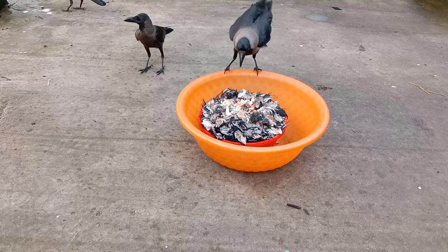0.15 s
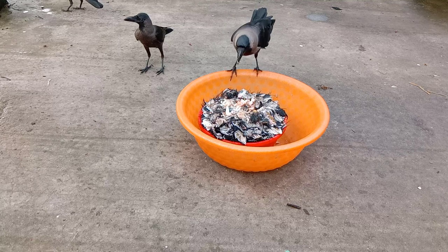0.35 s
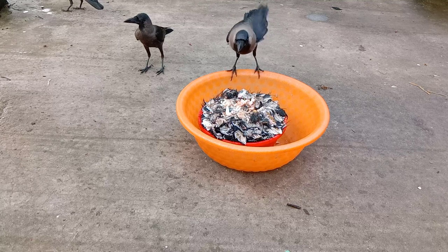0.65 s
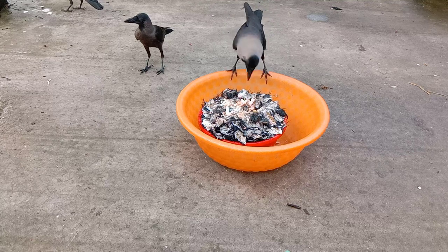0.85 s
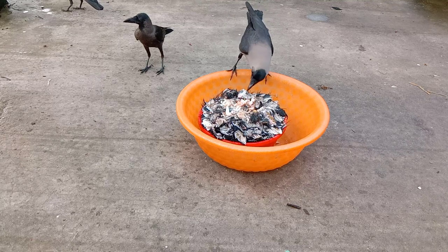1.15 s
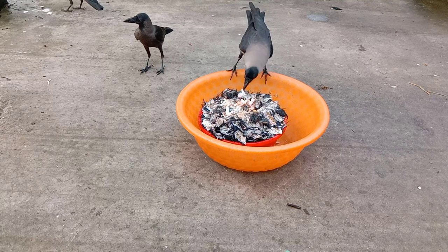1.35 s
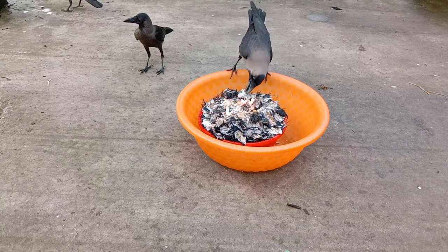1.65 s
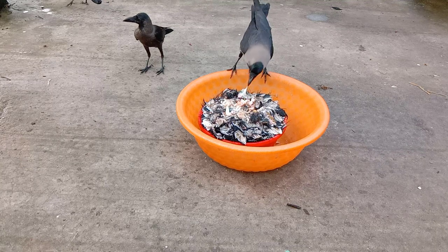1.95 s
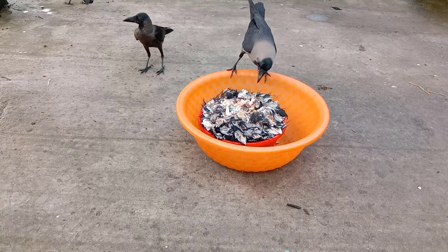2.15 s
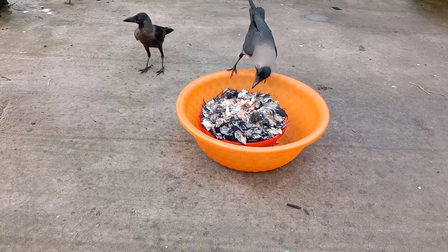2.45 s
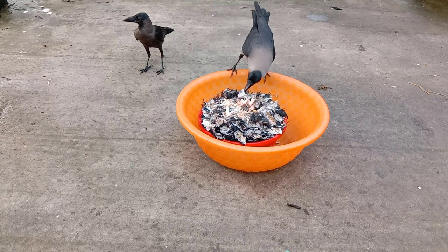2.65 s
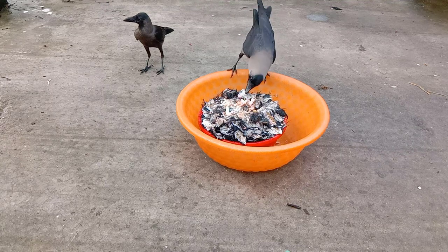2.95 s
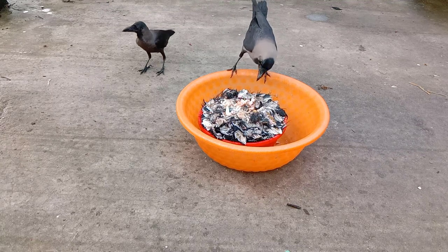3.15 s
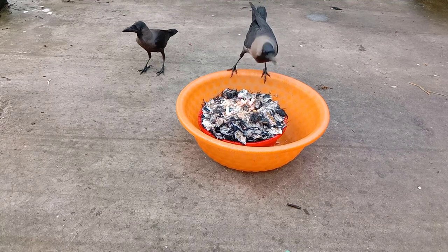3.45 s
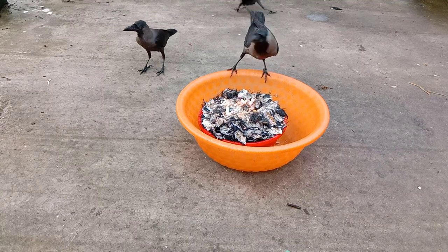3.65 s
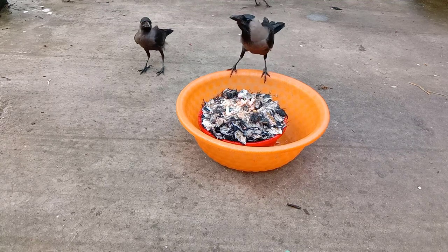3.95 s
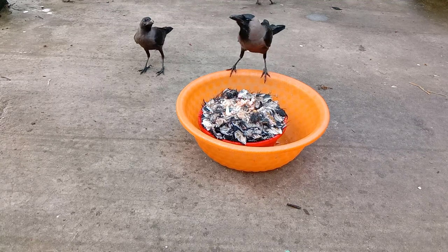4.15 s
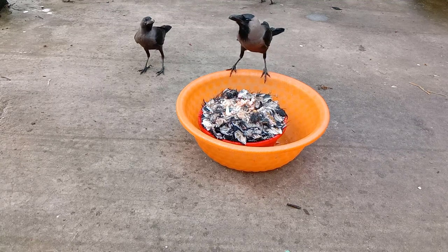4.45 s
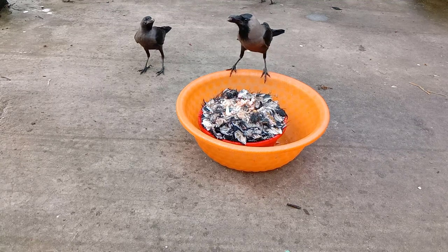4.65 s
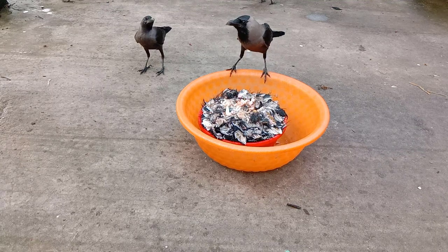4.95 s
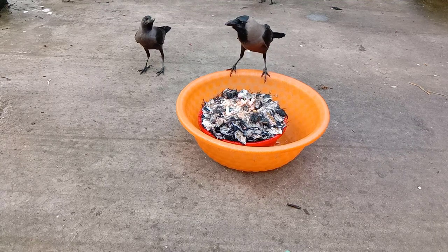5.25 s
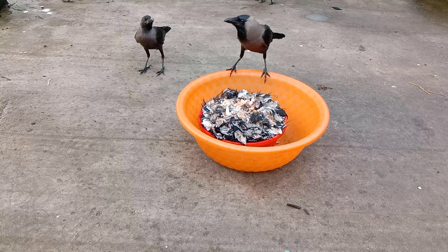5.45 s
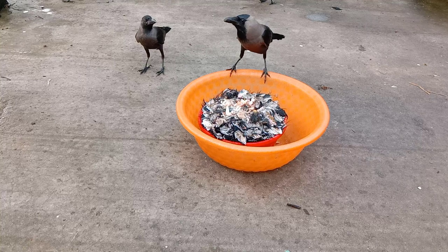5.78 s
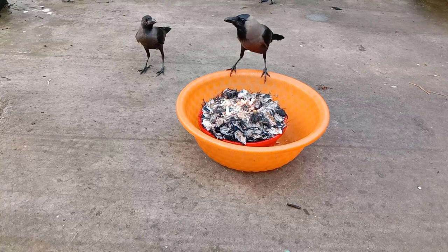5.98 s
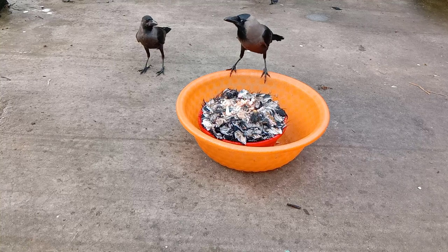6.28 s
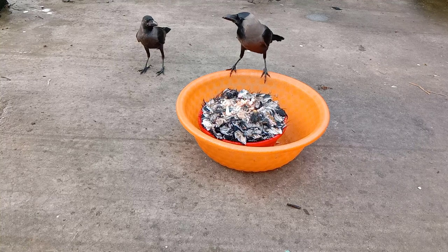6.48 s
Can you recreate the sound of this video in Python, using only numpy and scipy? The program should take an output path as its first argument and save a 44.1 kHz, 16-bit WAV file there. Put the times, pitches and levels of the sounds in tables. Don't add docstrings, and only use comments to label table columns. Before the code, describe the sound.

A crow near the microphone caws six times, each short, harsh and rattling, rising quickly then sagging. After the second caw starts, one sharp beak knock lands on a plastic basin; later light ticks and dry rustling follow the third. Behind are a throbbing insect, a buzzy small bird and far calls. Open concrete yard with short echoes and quiet, faintly hissing air.

```python
import sys
import numpy as np
from scipy import signal
from scipy.io import wavfile
from scipy.ndimage import uniform_filter1d

SR = 44100
rng = np.random.default_rng(int(sys.argv[2]) if len(sys.argv) > 2 else 0)


def makeup_ratio(level_db):
    decades = np.asarray(level_db, float) / 20
    return 10 ** decades


def store_pcm(level_fs):
    pcm = np.round(np.clip(level_fs, -1, 1) * 32767).astype(np.int16)
    wavfile.write(sys.argv[1], SR, np.atleast_2d(pcm).T)


N = 291942

# (frequency [Hz], density [dB per Hz])
AIR_SPECTRUM = [(25, -23.5), (50, -20.5), (100, -19.5), (200, -13), (500, -24), (2300, -23.5),
                (4200, -28.5), (5400, -9.5), (6200, -23), (7300, -25.5), (7700, -16), (9100, -6.5),
                (10500, -22.5), (11100, -61)]
# (frequency [Hz], width [Hz], level [dB])
HUM_TONES = [(99.9, 6.4, -84.5), (114, 4.6, -89), (203.1, 6.5, -83)]
# (peak time [s], width [s], level [dB])
WIND_GUSTS = [(.25, 0.07, -67), (1.88, .15, -82.5), (2.84, .07, -63), (3.051, 0.13, -64), (3.7, 0.48, -80),
              (4.458, 0.093, -88), (5.53, 0.062, -69), (5.79, 0.047, -68), (6.62, 0.026, -71)]
# (start [s], length [s], start pitch [Hz], end pitch [Hz], level [dB])
FAR_CALLS = [(0, 0.029, 806, 800, -60.5), (.03, 0.1, 806, 803, -73.5), (.03, 0.076, 2010, 2030, -72.5),
             (0, 0.11, 1532, 1570, -74), (.776, 0.06, 2260, 2330, -71), (.86, 0.19, 2510, 2434, -66.5),
             (1.0, 0.08, 2560, 2500, -76), (1.07, 0.185, 2560, 2640, -70), (.85, 0.25, 1823, 1784, -70.5),
             (.89, 0.15, 1400, 1405, -79), (1.12, .12, 1950, 1986, -83.5), (1.07, 0.22, 1622, 1796, -77.5),
             (1.523, 0.31, 2460, 2426, -57), (1.527, 0.13, 1224, 1410, -76), (2.24, 0.07, 1576, 1480, -79),
             (2.553, .05, 1500, 1480, -74), (2.553, .05, 1900, 1880, -73), (2.5, .03, 1850, 1800, -77),
             (3.17, 0.23, 1850, 1950, -75), (3.744, 0.1, 1067, 1044, -73.5),
             (3.761, 0.113, 1460, 1410, -71), (3.865, 0.057, 2246, 2433, -67),
             (3.988, 0.12, 1440, 1420, -73), (3.996, 0.052, 2544, 2446, -60),
             (4.19, 0.11, 1480, 1463, -75.5), (4.93, 0.1, 1496, 1520, -82.5),
             (4.9, 0.15, 2800, 2920, -77.5), (5.895, 0.19, 1210, 1179, -70.5),
             (5.905, 0.22, 1800, 1806, -72.5), (6.09, 0.086, 1754, 1493, -77),
             (6.17, 0.11, 1874, 1850, -81), (6.28, 0.18, 1872, 1890, -77), (6.24, 0.053, 2565, 2500, -74),
             (6.36, 0.047, 2922, 2820, -67)]
# (start [s], length [s], start pitch [Hz], end pitch [Hz], level [dB])
CHIRPS = [(1.04, 0.1, 3800, 3780, -73), (1.156, 0.065, 5900, 5850, -66), (1.27, 0.1, 3650, 3760, -68.5),
          (1.349, 0.15, 5950, 5800, -64), (1.44, 0.1, 3880, 3850, -75), (1.36, 0.07, 3820, 3850, -80),
          (1.7, .05, 3300, 4100, -77.5), (2.5, .1, 3750, 3850, -73), (4.3, .11, 4300, 4250, -71),
          (4.31, .09, 4750, 4000, -72), (4.22, .12, 3500, 3750, -69.5), (6.24, 0.083, 3750, 3700, -75),
          (4.33, .03, 2850, 2810, -72.5), (4.37, .04, 2500, 2520, -71.5), (6.3, .1, 4250, 4200, -73),
          (2.11, 0.087, 3630, 3840, -69), (1.908, 0.0035, 6500, 5800, -29),
          (2.355, 0.017, 15100, 15000, -63), (3.7, 0.089, 3400, 3800, -53), (3.171, 0.13, 3600, 3600, -76),
          (3.376, 0.11, 3800, 3750, -76), (3.53, 0.077, 3440, 3780, -72), (4.01, 0.027, 10950, 10500, -67),
          (4.114, 0.0382, 7000, 5350, -49.5), (0.78, 0.22, 3100, 3750, -77), (3.6, 0.037, 7500, 5000, -69),
          (4.106, .04, 13800, 12400, -75.5), (4.142, 0.084, 5500, 5400, -78.5),
          (4.295, 0.08, 6100, 6600, -61), (4.294, 0.066, 12100, 15000, -68.5),
          (4.785, 0.09, 3330, 3220, -68), (4.8, 0.043, 2600, 2600, -75), (3.3, 0.127, 1750, 1600, -72),
          (4.75, 0.08, 4000, 3800, -65), (6.27, .07, 3200, 3050, -77), (.68, 0.042, 1600, 2000, -81)]
# (start [s], length [s],
# level [dB], start pitch [Hz], end pitch [Hz])
HOARSE_SLIDES = [(3.0, 0.17, -55, 3600, 3520), (2.97, 0.126, -63, 4400, 4250),
                 (0.41, 0.096, -53, 3590, 3290), (.5, .1, -68.5, 2800, 2660), (.57, 0.22, -62, 2828, 3530),
                 (.72, .23, -62.5, 3260, 3603), (3.69, 0.066, -48, 5900, 5800),
                 (4.17, 0.094, -62.5, 2480, 2840), (0.91, .09, -69, 2780, 2650),
                 (1.04, 0.14, -72, 1503, 1750), (1.04, 0.082, -73, 3360, 3390)]
# (start [s], length [s], level [dB], start pitch [Hz],
# end pitch [Hz])
RAGGED_BUZZ = [(6.32, .08, -72, 3750, 3050), (5.7, .13, -71, 2250, 2350), (5.91, .2, -72, 2650, 2550),
               (6.04, .18, -69, 4050, 4150), (6.23, 0.13, -74, 3700, 3550), (5.83, .1, -72, 4600, 4600),
               (3.69, .12, -70, 2700, 2650), (.42, .13, -66, 2700, 2600)]
# (start [s], length [s], level [dB], start pitch [Hz], end pitch [Hz])
TRILLS = [(0, 0.11, -61, 3350, 3550), (2.28, 0.15, -67.5, 3670, 3525), (2.405, 0.44, -57, 3366, 3382),
          (3.683, 0.458, -57, 3450, 3400), (4.135, 0.11, -59, 3370, 3230)]
# (start [s], length [s], level [dB], start pitch [Hz], end pitch [Hz])
WIDE_TRILL = [(5.615, .61, -62, 3420, 3373)]
# (start [s], length [s], level [dB])
INSECT_THROBS = [(0, 0.07, -60.5), (0.496, 0.13, -64), (0.7, 0.11, -68), (0.819, 0.061, -65.5),
                 (1.038, 0.1, -67), (1.202, 0.16, -62), (1.402, 0.13, -58), (1.555, 0.18, -54),
                 (1.961, 0.13, -51.5), (2.161, 0.14, -58.5), (2.353, 0.13, -56.5), (2.494, 0.11, -63),
                 (2.971, 0.16, -59), (3.195, 0.12, -64), (3.377, 0.18, -64.5), (3.56, 0.36, -56.5),
                 (3.769, 0.13, -67), (3.881, 0.12, -60.5), (3.991, 0.096, -59), (4.137, 0.097, -62.5),
                 (4.345, 0.07, -68), (4.882, 0.06, -67.5), (5.036, 0.12, -64.5), (5.202, 0.094, -66.5),
                 (5.586, 0.15, -54), (5.786, 0.17, -58), (5.985, 0.16, -57.5), (6.164, 0.19, -57.5),
                 (6.388, 0.18, -55)]
# (start [s], hold [s], level [dB])
RUSTLES = [(0.023, 0.041, -68), (2.348, 0.0065, -80.5), (2.795, 0.058, -58), (2.862, .012, -48),
           (2.91, 0.019, -57), (3, 0.089, -71.5), (3.104, 0.034, -65.5), (3.291, 0.078, -79),
           (3.425, 0.046, -58.5), (3.667, 0.021, -49.5), (3.729, 0.02, -62)]
# (frequency [Hz], density [dB per Hz])
SCRAP_COLOUR = [(530, -66.5), (900, -34.5), (1350, -18), (2210, -20), (2620, -19.5), (3290, -12),
                (4540, -30.5), (5770, 1), (8170, -10), (12500, -14), (15300, -7)]
# (time [s], peak [dB], basin ring under the tick [dB], ring pitch [Hz])
BASIN_TICKS = [(0.9026, -45, -19, 1420), (1.9114, -7.5, -5.5, 1720), (2.358, -43, -45, 1150),
               (2.4985, -48, -32, 1300), (5.26, -45.5, -26, 1300), (3.122, -45, -24, 1250),
               (3.4318, -40, -5, 1177), (3.4503, -47.5, -26, 1220), (3.6585, -26, -11, 1433),
               (3.672, -48, -4, 1590), (3.675, -31, -12, 1900), (3.6993, -32, -43, 1410),
               (3.73, -38, -36, 1590), (3.736, -31, -47, 1290), (3.755, -40, -31, 1080)]
# (start [s], length [s], start pitch [Hz], end pitch [Hz], level [dB])
BEAK_CLACK = [(1.908, .009, 3600, 3500, -31)]
# (start [s], length [s], start pitch [Hz], end pitch [Hz], level [dB])
MUTTERS = [(1.625, .09, 440, 600, -56), (.19, .09, 500, 510, -66), (2.605, .06, 520, 620, -66),
           (6.435, .06, 520, 620, -66)]
# (start [s], length [s], start pitch [Hz], end pitch [Hz], level [dB])
SIGHS = [(.35, .08, 740, 520, -64), (1.9, .085, 760, 540, -59), (2.905, .08, 740, 450, -55),
         (4.69, .08, 760, 460, -56), (5.545, .085, 760, 440, -54)]
# (start [s], length [s], effort [dB], top pitch [Hz], undertone at the onset [dB])
CAWS = [
    (0.096, 0.31, -23, 1035, -71),
    (1.596, 0.37, -22, 1043, -67),
    (2.6, 0.37, -22.5, 1017, -73),
    (4.418, 0.335, -22.5, 1046, -76.5),
    (5.275, 0.33, -23, 1018, -76.5),
    (6.435, 0.28, -23.5, 1040, -70.5),
    (0.3, 0.25, -52, 1108, -77),
]
# (crest after the start [s], start drop [share], slide [share], end drop [share], beak
CAW_ARCHES = [(.135, .36, .17, 0.32, 0.96), (.12, .36, .21, .27, 0.95), (.125, .33, .09, 0.37, 0.99),
              (.13, 0.3, .11, .4, 1.01), (.11, .33, .11, 0.36, 1), (.11, .27, .11, 0.44, 0.98),
              (0.077, 0.13, 0.04, 0.073, .95)]
# (uneven beats [dB], brightness [dB])
CAW_TIMBRES = [(3.0, -0.45), (3.5, -0.5), (-0.5, 0.2), (2, 2.5), (2, 1.3), (4.0, 2.8), (1.7, -2.4)]
# (frequency [Hz], level [dB])
THROAT = [(900, -14), (1300, -9), (1650, -10), (1950, -1.5), (2250, -4), (2600, -16.5), (3000, -16.5),
          (3500, -20.5),
          (3950, -24.5), (4350, -18.5), (4800, -15.5), (5500, -9), (5950, -11), (6250, -21.5),
                (7100, -21), (9500, -39.5), (12000, -46.5), (15300, -42)]
# (frequency [Hz], decay by 60 dB [s])
YARD_DECAY = [(300, 0.02), (1000, 0.15), (3000, 0.19), (8000, 0.11)]
# (frequency [Hz], level [dB])
WALL_COLOUR = [(600, -55), (1000, -36.5), (1400, -36.5), (1900, -29.5), (2500, -36), (3500, -36.5),
               (5000, -37.5), (9000, -47)]

TOP_HZ = 1030
CLEAR = 0.9


def evened(x):
    return x / np.sqrt(np.mean(x ** 2) + 1e-20)


def read(points, hz):
    f, value = np.transpose(points)
    return np.interp(np.log(hz + 1), np.log(f + 1), value)


def add(mix, s, sound):
    part = mix[round(s * SR):][:len(sound)]
    part += sound[:len(part)]


def resonate(x, hz, width):
    turn = np.exp(2j * np.pi * np.cumsum(hz * np.ones(len(x))) / SR)
    r = np.exp(-np.pi * width / SR)
    return 2 * (turn * signal.lfilter([1 - r], [1, -r], x / turn + 1e-18)).real


def fuzzy(hz, width, length):
    once = resonate(rng.standard_normal(length), hz, width)
    return evened(resonate(once, hz, width))


def wander(length, span_s):
    wide = max(int(span_s * SR), 1)
    return evened(uniform_filter1d(uniform_filter1d(rng.standard_normal(length), wide), wide))


def colour(x, points):
    level_db = read(points, abs(np.fft.fftfreq(4096, 1 / SR)))
    log_gain = np.log(makeup_ratio(np.maximum(level_db, -100)))
    taps = np.fft.ifft(np.exp(log_gain - 1j * signal.hilbert(log_gain).imag)).real[:2048]
    return signal.oaconvolve(x, taps)[:len(x)]


def glides(rows, blur, arch, clear=0):
    out = np.zeros(N)
    for s, length, start_hz, end_hz, db in rows:
        steps = int(length * SR)
        hz = start_hz + (end_hz - start_hz) * np.linspace(0, 1, steps) ** 1.8
        hz = hz + arch * start_hz * np.hanning(steps)
        whistle = clear * np.sin(2 * np.pi * np.cumsum(hz) / SR)
        core = (1 - clear / 2) * fuzzy(hz, blur * start_hz, steps)
        skirt = makeup_ratio(-8.0) * fuzzy(hz, 5.0 * blur * start_hz, steps)
        add(out, s, makeup_ratio(db) * (whistle + core + skirt) * signal.windows.tukey(steps, .5))
    return out


def buzz(rows, soft, span_hz, sweeps_hz, throbs_hz, throb_db, blur_db, ragged_db=1.0):
    out = np.zeros(N)
    for s, length, db, start_hz, end_hz in rows:
        steps = int(length * SR)
        hz = np.linspace(start_hz, end_hz, steps)
        sweep = np.cumsum(sweeps_hz * (1 + 0.12 * wander(steps, 0.011))) / SR % 1
        turns = np.cumsum(hz + span_hz * (.5 - sweep)) / SR
        tone = np.sin(2 * np.pi * turns) + makeup_ratio(-26.5) * np.sin(4 * np.pi * turns)
        chirps = evened(np.sin(np.pi * sweep) * tone) * makeup_ratio(4.0 * wander(steps, 0.0035))
        blur = sum(fuzzy(hz + side * span_hz, span_hz / 4.5, steps) for side in (-.36, 0, .36))
        body = chirps + makeup_ratio(blur_db) * evened(blur)
        throb = -np.cos(2 * np.pi * throbs_hz * np.arange(steps) / SR + 0.18 * wander(steps, .05))
        body = evened(body * makeup_ratio(throb_db * throb + ragged_db * wander(steps, 0.026)))
        add(out, s, makeup_ratio(db) * body * signal.windows.tukey(steps, min(soft, 1)))
    return out


def air():
    frames, hz = N // 256 + 5, np.fft.rfftfreq(1024, 1 / SR)
    a, b, patches = rng.standard_normal((frames, 513, 3)).T
    patches = evened(uniform_filter1d(uniform_filter1d(patches, 10, 0), 14, 1))
    patch_db = np.where(hz > 7000, .8, 2.6)[:, None] * patches
    z = (a + 1j * b) * makeup_ratio(read(AIR_SPECTRUM, hz)[:, None] + patch_db)
    return makeup_ratio(-67.5) * evened(signal.istft(z, nperseg=1024, noverlap=768)[1][:N])


def hum():
    return sum(makeup_ratio(db) * fuzzy(hz, width, N) for hz, width, db in HUM_TONES)


def wind():
    t = np.arange(N) / SR
    gusts = sum(makeup_ratio(db) * np.exp(-((t - s) / width) ** 2) for s, width, db in WIND_GUSTS)
    gain = makeup_ratio(-86) + gusts
    return gain * makeup_ratio(-9.5) * fuzzy(110, 70, N) * makeup_ratio(1.2 * wander(N, .04))


def far_birds():
    sound = glides(FAR_CALLS, .02, .04, CLEAR) + glides(CHIRPS, .022, 0, CLEAR)
    sound += buzz(HOARSE_SLIDES, 0.36, 580, 110.0, 15.5, 1.7, 2.1)
    return sound + buzz(RAGGED_BUZZ, 0.33, 700, 120.0, 12.0, 3.2, 2.5, 7.3)


def trilling_bird():
    sound = buzz(TRILLS, 0.28, 720, 120.0, 14.7, 5.5, -1.7, 0.93)
    return sound + buzz(WIDE_TRILL, 0.062, 1070, 110.0, 13.8, 5.9, 0.3, 1.4)


def insect():
    hz, halo_s = 5340, 0.12
    throbs = [(*row, hz, hz) for row in INSECT_THROBS]
    halo = [(max(s - halo_s, 0), length + 2 * halo_s, db - 12.5, hz, hz) for s, length, db in INSECT_THROBS]
    sound = buzz(throbs, 0.66, 640, 95.0, 25.0, 0.73, -0.5)
    return sound + buzz(halo, 0.71, 700, 100.0, 20.0, 1.2, -1.1)


def rustle():
    grains = rng.standard_normal(N) * makeup_ratio(2.2 * wander(N, 0.003))
    out, sound = np.zeros(N), colour(grains, SCRAP_COLOUR)
    top = signal.sosfilt(signal.butter(4, 11000, "high", fs=SR, output="sos"), sound)
    sound /= np.sqrt(np.mean(top ** 2))
    t = np.arange(SR // 4) / SR
    rise_s, fall_db_per_s = 0.0038, -280
    for s, hold, db in RUSTLES:
        shape = np.minimum(t / rise_s, 1) * makeup_ratio(db + fall_db_per_s * np.maximum(t - hold, 0))
        add(out, s, shape * sound[round(s * SR):][:len(t)])
    return out


def ticks():
    out, t = np.zeros(N), np.arange(1500) / SR
    for s, db, ring_db, hz in BASIN_TICKS:
        crack = colour(rng.standard_normal(len(t)) * makeup_ratio(-60 * t / 0.0016), SCRAP_COLOUR)
        ring_db = min(ring_db, -36 - db)
        ring = makeup_ratio(ring_db - 60 * t / 0.028) * np.sin(2 * np.pi * hz * t) * (1 - np.exp(-t / 0.0022))
        add(out, s, makeup_ratio(db) * (0.82 * crack / abs(crack).max() + ring))
    return out


def mutters_and_clack():
    return glides(SIGHS, .09, 0) + glides(MUTTERS, .09, 0) + makeup_ratio(-1.0) * glides(BEAK_CLACK, .04, 0, CLEAR)


def breath(length, top_db, top_hz, onset_db, crest_s, start_drop, slide, end_drop):
    t = np.arange(0, length, 1 / SR)
    attack_s, release_s = 0.13, 0.076
    attack_db = -23 * np.clip(1 - t / attack_s, 0, 1) ** 3.17
    release_db = -21 * np.clip((t - length) / release_s + 1, 0, 1) ** 2.25
    effort_db = top_db + attack_db - 35 * np.maximum(t - crest_s, 0) + release_db

    rise = np.clip(1 - t / crest_s, 0, 1)
    sag = np.clip((t - crest_s) / (length - crest_s), 0, 1)
    hz = top_hz * (1 - start_drop * rise ** 2.0 - slide * sag - end_drop * sag ** 4.2)

    floor_db, end_db = -83, -65.5
    onset = np.exp(-(t / 0.082 - .8) ** 2 * 2.3)
    under_db = floor_db + (onset_db - floor_db) * onset + (end_db - floor_db) * sag ** 8.1
    under_db = under_db + top_db + 24.0 + 1.3 * wander(len(t), 0.017)
    return effort_db, under_db, hz


def voice_box(hz, half_db):
    n = len(hz)
    rough = np.clip(.13 + 1 - hz / TOP_HZ, .05, 1)
    rattle_hz = 73.5 * np.sqrt(hz / TOP_HZ)
    beat = np.cumsum(rattle_hz * (1 + (.03 + .15 * rough) * wander(n, .012))) / SR
    snap_share = .12
    snap = np.exp((beat % 1 - 1) / snap_share) - snap_share
    bend = -.068 * np.sin(2 * np.pi * beat) + .08 * snap
    jitter = .05 * rough * wander(n, .0012) + .008 * wander(n, .012)
    turns = np.cumsum(hz * (1 + bend + jitter)) / SR
    voice = sum(np.cos(2 * np.pi * k * turns - .3 * k * k) for k in range(1, 16))
    halves = sum(np.cos(2 * np.pi * (k - .5) * turns + .3 * k * k) for k in range(2, 16))
    side, side_gain = np.cos(2 * np.pi * turns * 8 / 7), makeup_ratio(-12.5)
    voice = voice * (1 + side_gain * 2 * side) + side_gain * side
    puffs = (0.78 + np.cos(2 * np.pi * turns)) * rng.standard_normal(n)
    drive = evened(voice) + makeup_ratio(half_db + 2.2 * wander(n, .04)) * evened(halves)
    drive += .5 * rough * evened(puffs)
    drive += .2 * evened(np.diff(puffs, prepend=0))
    return drive * makeup_ratio(0.5 * np.cos(2 * np.pi * (beat - .3)))


def throat_and_beak(drive, hz, effort_db, beak, bright_db):
    f, t, z = signal.stft(drive, SR, nperseg=1024, noverlap=896)
    f, samples = f[:, None] + 1, np.arange(len(hz))
    pitch = np.interp(t * SR, samples, hz)
    closing = (TOP_HZ / pitch) ** 0.2 / beak
    z *= makeup_ratio(read(THROAT, f * closing ** np.clip(2 - f / 3000, 0, 1)))
    slack_db = np.interp(t * SR, samples, effort_db - effort_db.max())
    z *= makeup_ratio(0.25 * slack_db * np.log2(f / 1500))
    patches = uniform_filter1d(uniform_filter1d(rng.standard_normal(z.shape), 8, 0), 10, 1)
    z *= makeup_ratio(1.6 * np.clip(f / 2000, .5, 1.8) * evened(patches))
    z *= makeup_ratio(bright_db * np.clip(np.log2(f / 2500), 0, 1))
    z *= makeup_ratio(-22 * np.clip(1 - pitch / TOP_HZ, 0, 1) * np.clip(3 - 2 * f / pitch, 0, 1))
    z *= makeup_ratio(-4.0 * np.exp(-((f / pitch - 1.2) / .06) ** 2))
    z *= makeup_ratio(np.clip(150.0 * np.log2(f / (0.88 * pitch)), -60, 0))
    return signal.istft(z, SR, nperseg=1024, noverlap=896)[1][:len(hz)]


def caw(length, top_db, top_hz, onset_db, arch, timbre):
    *bends, beak = arch
    uneven_db, bright_db = timbre
    effort_db, under_db, hz = breath(length, top_db, top_hz, onset_db, *bends)
    half_db = -4.5 + 0.24 * (onset_db + 66.0) + 0.58 * (under_db - effort_db + 47.0)
    half_db = np.clip(half_db, -13.0, -3.0) + uneven_db
    sound = throat_and_beak(voice_box(hz, half_db), hz, effort_db, beak, bright_db)
    steady = np.sqrt(uniform_filter1d(sound ** 2, 1800) + 1e-12)
    undertone = makeup_ratio(under_db) * fuzzy(np.maximum(hz / 2, 490), 82, len(hz))
    return (makeup_ratio(effort_db) * sound / steady + undertone) * signal.windows.tukey(len(hz), .14)


def crow():
    out = np.zeros(N)
    for (s, *row), arch, timbre in zip(CAWS, CAW_ARCHES, CAW_TIMBRES):
        add(out, s, caw(*row, arch, timbre))
    return out


def yard(x):
    taps = np.zeros(SR // 2)
    at = np.arange(300, SR // 2 - 20, 20)
    taps[[130, 215]] = 1.3, -1.0
    taps[at + rng.integers(0, 20, len(at))] = rng.choice([-1., 1.], len(at))
    hz, t, z = signal.stft(taps, SR, nperseg=256)
    uneven = uniform_filter1d(rng.standard_normal(z.shape), size=20, axis=1)
    z *= makeup_ratio(3.5 * evened(uneven))
    tail = signal.istft(z * makeup_ratio(-60 * t / read(YARD_DECAY, hz)[:, None]), SR, nperseg=256)[1]
    return signal.fftconvolve(x, tail / np.linalg.norm(tail))[:N]


def wall(x):
    t = np.arange(SR // 5) / SR
    slap_s, spread_s = .055, .04
    fade = np.exp(-abs(t - slap_s) / spread_s * np.where(t < slap_s, 2, 1.1))
    taps = rng.standard_normal(len(t)) * fade
    streaks = [(hz, 9.0 * rng.standard_normal()) for hz in np.arange(100, 12000, 90)]
    taps = colour(taps, streaks)
    return colour(signal.fftconvolve(x, taps / np.linalg.norm(taps))[:N], WALL_COLOUR)


def scene():
    background = air() + hum() + wind()
    calls = far_birds() + trilling_bird() + insect()
    near = ticks() + mutters_and_clack() + crow()
    echoes = makeup_ratio(-7.0) * yard(near + makeup_ratio(2.5) * calls) + wall(near)
    return (background + calls + rustle() + near + echoes)[None]


def band_limit(x):
    return signal.sosfilt(signal.butter(12, 16530, fs=SR, output="sos"), x)


def record(dry):
    low = signal.sosfiltfilt(signal.butter(2, 420, fs=SR, output="sos"), dry)
    power_db = 10 * np.log10(uniform_filter1d(dry ** 2, 3000) + 1e-12)
    lift_db = -2.0 + 10.0 * np.clip((power_db + 70.5) / 45, 0, 1)
    z = signal.stft(dry + low * (makeup_ratio(lift_db) - 1), nperseg=1024, noverlap=768)[2]

    smooth = uniform_filter1d(uniform_filter1d(abs(z) ** 2, size=5, axis=2), size=3, axis=1)
    bins_db = 10 * np.log10(abs(smooth) + 1e-16)
    over_db = bins_db - np.percentile(bins_db, 15, axis=2)[..., None]
    z = z * makeup_ratio(-2 * np.clip(-over_db / 9.5, 0, 1))
    mix = signal.istft(z, nperseg=1024, noverlap=768)[1][:, :N]
    mix *= makeup_ratio(-5 * np.clip((-58.0 - power_db) / 6.6, 0, 1))

    treble_edge = signal.firwin(301, 15700, window=("kaiser", 5), fs=SR)[None]
    return band_limit(signal.oaconvolve(mix, treble_edge, "same"))


dry = scene()
out = record(dry)
store_pcm(out)
```